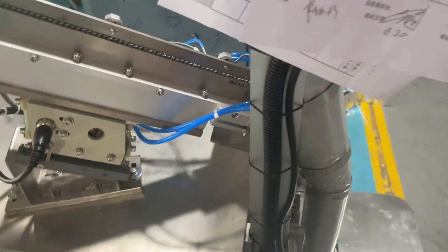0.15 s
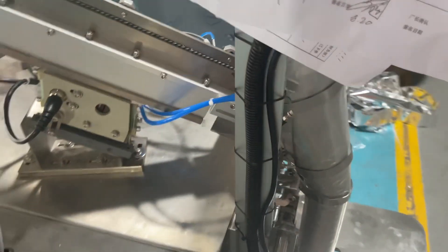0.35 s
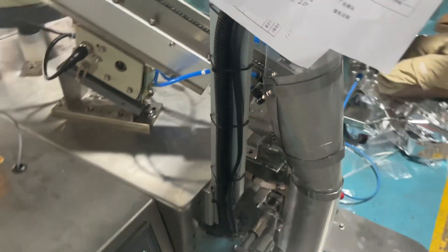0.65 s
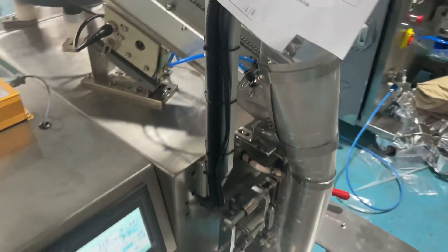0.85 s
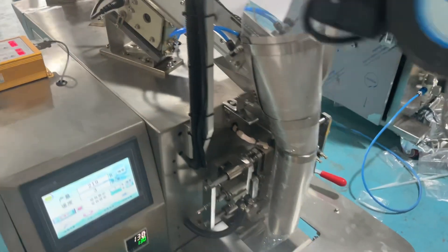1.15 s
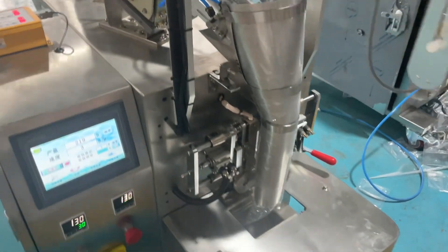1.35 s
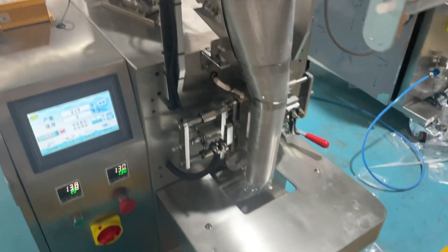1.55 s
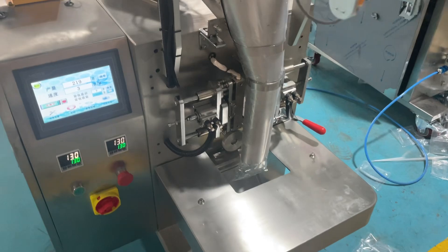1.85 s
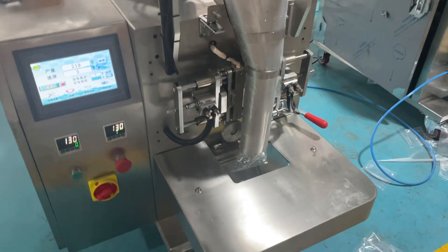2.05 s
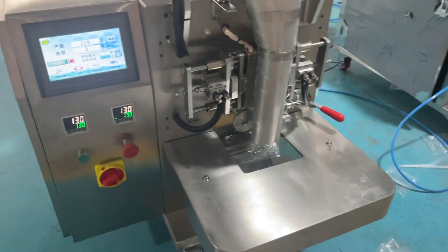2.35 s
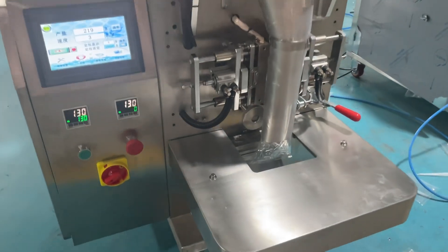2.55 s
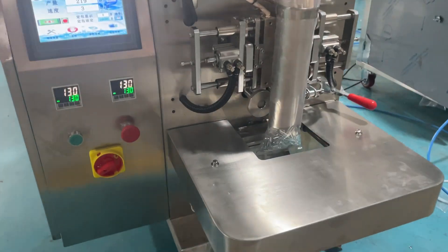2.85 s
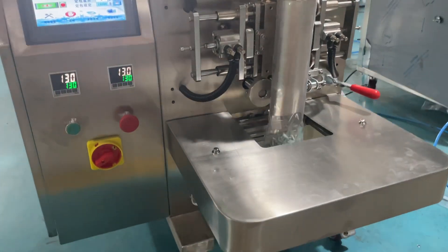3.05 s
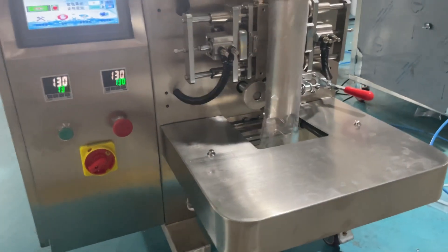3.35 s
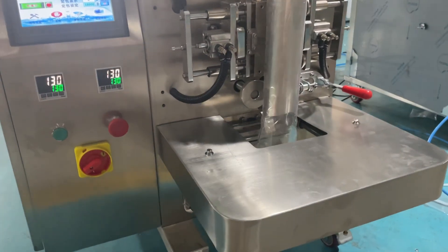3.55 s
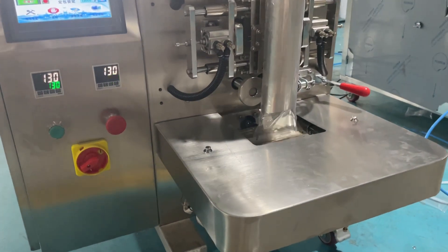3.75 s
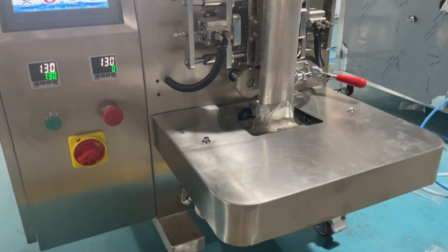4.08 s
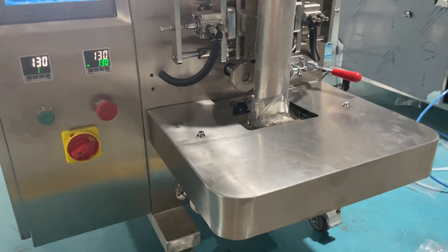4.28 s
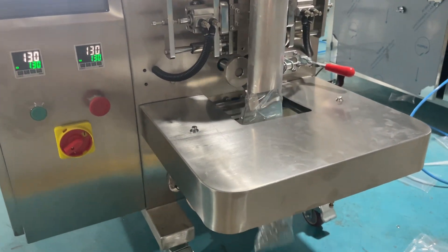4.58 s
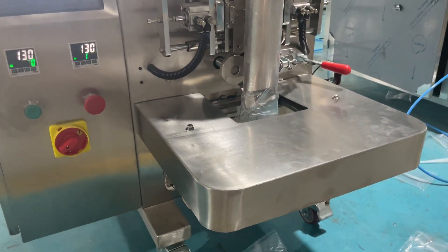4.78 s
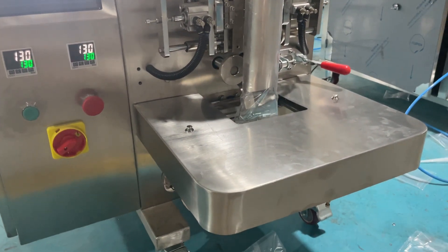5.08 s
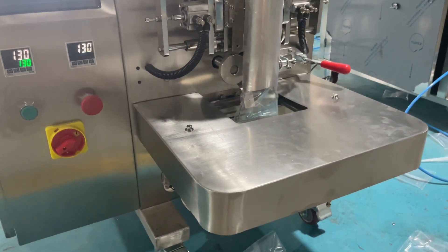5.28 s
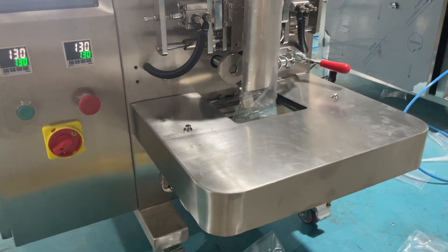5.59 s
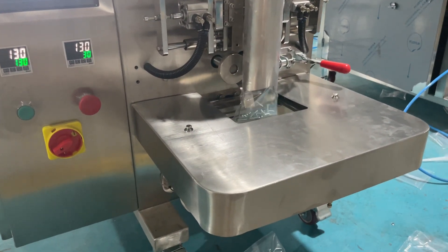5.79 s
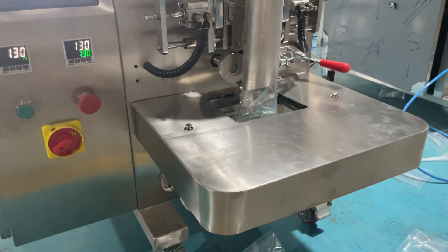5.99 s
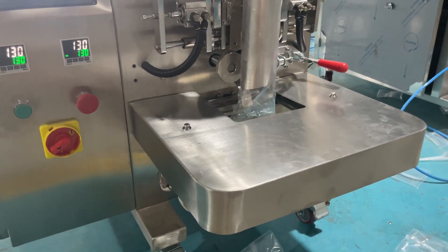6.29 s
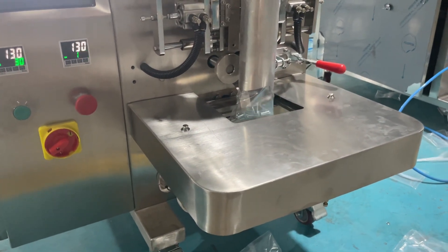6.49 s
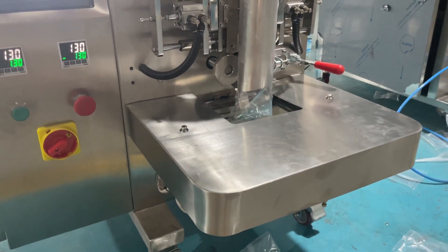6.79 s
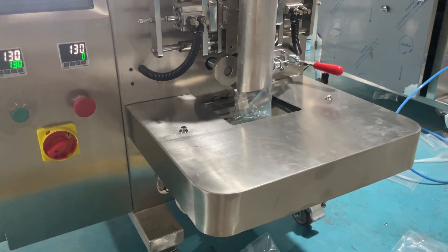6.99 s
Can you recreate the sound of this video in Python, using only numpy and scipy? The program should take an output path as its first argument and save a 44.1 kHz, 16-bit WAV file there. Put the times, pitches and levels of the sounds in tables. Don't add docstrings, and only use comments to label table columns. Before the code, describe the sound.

Close stereo in a factory hall: a low mains hum shakes screws along a steel track with bright, grainy rattle, clicks into a chute and dull regular knocks from a distant press. The feed pauses; jaw drive rumbles, cylinders thud in a cluster and stray screws ping. Finally a buzzier feeder starts and a loud batch clatters down.

```python
import sys
import numpy as np
from scipy import signal
from scipy.fft import rfft, irfft, next_fast_len
from scipy.io import wavfile

SR = 44100
rng = np.random.default_rng(int(sys.argv[2]) if len(sys.argv) > 2 else 0)


def pcm_store(signal):
    levels = np.round(np.clip(np.atleast_2d(signal), -1, 1) * 32767)
    wavfile.write(sys.argv[1], SR, levels.astype(np.int16).T)


def voltage_ratio(level):
    return 10 ** (np.asarray(level, float) / 20)


N = 314433

MAINS_HZ = 50.0
# multiple of the mains frequency, level in [dB].
FIRST_ORDERS = [(1, 1.5), (2, -7), (3, -5), (4, -14), (5, -13.5), (6, -14), (7, -15.5), (8, -16.5),
                (9, -16), (10, -28)]
SECOND_ORDERS = [(1, 1.5), (2, -3.5), (3, -4.5), (4, -13), (5, -20), (6, -21), (7, -12.5), (8, -15.5),
                 (9, -7.5), (10, -8), (11, -42), (12, -26), (13, -24.5), (14, -29), (15, -37), (16, -25),
                 (17, -28), (18, -8.5), (19, -15.5), (20, -35), (21, -21.5), (22, -21.5), (23, -25)]
# on in [s], off in [s], level of the 50 Hz tug in [dB].
FIRST_FEED = [
    (-0.3, 1.33, -35.5),
    (0.85, 1.5, -48),
    (1.72, 1.804, -25.5),
    (2.09, 2.11, -32),
]
SECOND_FEED = [
    (5.125, 7.5, -29),
]
SPIN_UP_S, RUN_DOWN_S = 0.11, 0.12

# time in [s], level in [dB].
HALL_LEVEL = [(0, -38.5), (0.32, -33.5), (0.55, -39), (1.3, -37), (1.5, -49.5), (1.75, -42), (2.28, -40.5),
              (2.98, -49), (3.2, -41.5), (3.38, -53), (3.6, -42), (4.1, -43.5), (4.3, -42), (4.67, -31.5),
              (4.95, -46), (5.14, -48), (5.3, -34), (7.13, -33.5)]
# frequency in [Hz], level in [dB per Hz].
RUMBLE_SPECTRUM = [(26, -79), (45, -1), (140, -3), (172, -7.5), (230, -10), (270, -15.5), (321, -12),
                   (500, -19), (650, -41), (1100, -120)]
# frequency in [Hz], level in [dB per Hz].
ROAR_SPECTRUM = [(200, -11), (280, -1), (350, -2.5), (500, -6), (700, -11.5), (1000, -7.5), (1500, -12),
                 (2300, -12.5), (3000, -9.5)]
# start in [s], stop in [s], added rumble in [dB].
JAW_DRIVE = [
    (1.3, 1.937, 7.5),
    (1.98, 3.0, 1.5),
    (3.053, 3.474, 10),
    (3.497, 4.988, 8.5),
    (5.133, 5.954, 8),
]
DRIVE_EASE_S = 0.048
RUMBLE_DB, RUMBLE_FOLLOWS = -44.5, 0.34

# time in [s], level in [dB].
TRACK_LEVEL = [(0, -29.5), (1.33, -37), (1.41, -45), (1.55, -49), (1.66, -39.5), (1.89, -40), (2.2, -36),
               (2.46, -43), (2.86, -51), (3.5, -53), (3.71, -47), (4.53, -33.5), (4.75, -40.5), (5.1, -54),
               (5.2, -39.5), (5.32, -36.5), (5.62, -32.5), (7.13, -35)]
# frequency in [Hz], level in [dB per Hz].
RATTLE_SPECTRUM = [(1000, -6.5), (1700, 4), (2700, 4.5), (4300, 8.5), (5500, 11.5), (7200, -7), (9000, 22),
                   (11000, -7), (12700, 3.5), (14500, 5.5), (15700, -5)]
# frequency in [Hz], width in [Hz], level in [dB].
TRACK_MODES = [(1470, 70, -6), (2200, 50, -9), (2650, 40, -7), (2900, 70, -3), (3420, 40, -9),
               (4220, 30, -9), (4495, 25, -7), (4635, 40, -9), (5550, 30, -10), (5900, 25, -10),
               (6170, 22, -8), (6595, 20, -7), (7100, 40, -10), (9765, 30, -13)]
FED_BRIGHT_DB, IDLE_BRIGHT_DB, BRIGHT_FOLLOWS = 5, -2.5, 0.3

# start in [s], end in [s], from in [Hz], to in [Hz], level in [dB].
SQUEAKS = [(1.315, 1.39, 980, 1400, -33), (1.43, 1.49, 1130, 1080, -41), (3.0, 3.55, 5950, 5850, -50),
           (2.64, 3.0, 4650, 4430, -50), (.36, .5, 6600, 6600, -41), (.72, .92, 6600, 6600, -39),
           (1.15, 1.43, 6600, 6600, -43), (1.753, 1.9, 2980, 2980, -35), (1.753, 1.86, 4430, 4430, -36),
           (3.02, 3.4, 4500, 4450, -51), (0, 1.0, 2950, 2950, -41), (.9, 1.45, 2950, 2900, -42),
           (4.96, 4.99, 1550, 1600, -42), (4.065, 4.15, 4650, 4650, -38), (6.474, 6.505, 13500, 13500, -12),
           (3.987, 4.012, 13600, 13600, -30), (4.06, 4.1, 6800, 6800, -35), (4.2, 4.25, 1200, 1000, -36)]

# start in [s], peak in [dB].
DROPS = [(0.131, -15), (0.207, -11), (0.249, -12.5), (0.963, -14), (0.99, -14), (1.0227, -10.5),
         (1.073, -11.5), (5.4565, -23), (5.53, -6.5), (5.951, -17.5), (6.192, -12), (6.258, -8),
         (6.307, -11), (6.345, -7.5), (6.479, -10), (7.034, -10), (7.113, -5)]
DROP_T60_S, DROP_TREBLE_DB = 0.053, 5.5
# start in [s], peak in [dB], spill T60 in [s].
SPILLS = [(1.451, -12.5, 0.019), (1.695, -26, 0.28), (1.7544, -18, 0.17), (2.248, -27, 0.11),
          (2.504, -14, 0.11), (2.538, -27, 0.057), (2.5825, -29.5, 0.16), (3.011, -27.5, 0.019),
          (3.52, -32, 0.11), (3.55, -19.5, 0.04), (3.819, -11.5, 0.031), (3.8255, -13, 0.035),
          (3.916, -26, 0.025), (4.042, -32, 0.023), (3.844, -9.5, 0.042), (3.8783, -12.5, 0.063),
          (3.9867, -16.5, 0.035), (4.018, -21, 0.033), (4.0597, -13.5, 0.027), (4.349, -16.5, 0.054),
          (4.4844, -15, 0.036), (4.58, -12, 0.037), (4.614, -13, 0.15), (5.138, -30, 0.14),
          (5.152, -17, 0.024)]
SPILL_TREBLE_DB = 4.5
# start in [s], peak in [dB].
STRAGGLERS = [(0.167, -8), (0.6504, -10), (1.144, -8.5), (1.633, -38), (2.653, -19.5), (3.0829, -38),
              (3.378, -26), (3.5093, -28), (4.2, -34), (4.324, -13.5), (4.732, -16.5), (5.1262, -28),
              (5.4081, -14), (5.568, -5.5), (5.588, -6.5), (6.274, -6), (6.337, -7), (6.376, -2.5),
              (6.389, -3.5), (6.4964, -14), (7.028, -14), (7.066, -15), (5.615, -11)]
STRAGGLER_T60_S, STRAGGLER_TREBLE_DB = 0.027, 0.5
# frequency in [Hz], level in [dB], T60 in [s].
CHUTE_MODES = [(2250, -4, .1), (2880, 0, .12), (3060, -3, .1), (3320, -1, .1), (3660, -3, .1),
               (3900, -3, .08), (4180, -1, .1), (4480, 0, .12), (4640, -2, .1), (4930, -3, .08),
               (5370, -3, .08), (5550, -3, .08), (6050, -4, .08), (6620, -3, .08), (7100, -5, .06),
               (10100, -8, .05), (11050, -8, .05)]
# frequency in [Hz], level in [dB per Hz].
CRACK_SPECTRUM = [(1500, -10.5), (2200, -17), (2900, -1), (4600, 2.5), (6000, -2), (7800, 1)]
TAIL_T60_S, RING_DB = 0.28, -31

# start in [s], peak in [dB], ping in
# [Hz], bright edge in [dB].
STRIKES = [(0.1313, -11, 3830, -12), (0.2097, -10, 2900, -14), (0.6518, -16, 4510, -16),
           (0.966, -19, 4660, 1), (0.99, -10, 4650, -12), (1.0221, -15, 3440, -6), (1.075, -15, 5480, 0),
           (1.1438, -19, 4400, -5), (1.4541, -20.5, 2900, -7), (1.7021, -16.5, 3330, -20),
           (1.7579, -9, 3020, -21), (2.252, -12, 2900, -18), (2.5088, -22, 3330, -15),
           (3.0111, -40, 3210, -7), (3.083, -30, 5900, -11), (3.3813, -26.5, 4420, -15),
           (3.5105, -27, 3000, -20), (3.5239, -21, 2240, -18), (3.5514, -18, 2170, -9),
           (3.7403, -26, 2260, -19), (3.8267, -14, 3520, -18), (3.847, -10, 4790, -22),
           (3.8816, -13, 4140, -4.5), (3.9764, -21, 3960, -15), (3.9894, -19, 6460, -18),
           (4.0183, -20.5, 2106, -4), (4.063, -16.5, 4300, -17), (4.2045, -16, 2660, -24),
           (4.3208, -16, 3940, -23), (4.3531, -21, 4900, -19), (4.4864, -8.5, 3060, -12),
           (4.581, -15, 4410, -25), (4.6145, -8, 4540, -15), (5.1258, -28, 3740, -10),
           (5.1506, -23, 3330, -9), (5.1545, -21, 4840, -9), (5.4097, -10.5, 4300, -15),
           (5.4552, -15, 2650, -11), (5.529, -7.5, 5630, -27), (5.5918, -4.5, 4352, -24),
           (6.1939, -10.5, 4030, -3), (6.2634, -11, 4660, -17), (6.3075, -8, 5760, -23),
           (6.3425, -6.5, 4590, -19), (6.3774, 1.5, 6202, -24), (6.4777, -9.5, 3570, -16),
           (7.0384, -17, 4010, -9), (7.1188, -17, 4070, -18),
           (2.5405, -20, 6840, -12), (2.585, -18, 6900, -12), (2.621, -28, 4600, -8),
           (3.919, -19, 3000, -20), (5.578, -8, 2970, -20), (5.622, -13, 4600, -20),
           (5.645, -16, 4600, -18), (5.692, -10.5, 3130, -25), (5.967, -16, 6100, -17),
           (6.278, -14, 3560, -12), (0.963, -17, 4240, -7), (3.514, -27, 2950, -13), (6.392, -5, 4280, -22),
           (6.408, -11, 4000, -18)]
# share of the ping pitch [ratio], level in [dB].
PING_RATIOS = [(1, 4.5), (1.1, -8), (.73, -15), (1.17, -8.5), (1.3, -1), (1.58, -14), (1.4, 0)]
# frequency in [Hz], level in [dB], T60 in [s].
FUNNEL_MODES = [(1500, -10.5, 0.21), (1950, -13, 0.12), (2217, -11.5, 0.19), (2324, -13, 0.18)]
STRIKE_DB, CONTACT_T60_S, PING_T60_S = -11.5, 0.016, 0.052
EDGE_DB, EDGE_T60_S, EDGE_RISE_S = 21, 0.041, 0.0033

# start in [s], peak in [dB].
PRESS_KNOCKS = [
    (0.256, -10),
    (0.655, -11.5),
    (1.056, -13),
    (1.455, -13),
    (1.858, -15),
    (2.258, -13.5),
    (2.649, -15),
    (5.849, -39),
    (6.249, -19),
    (6.638, -34),
]
# frequency in [Hz], level in [dB], T60 in [s].
PRESS_MODES = [(72, 0.5, 0.094), (308, -6.5, 0.079), (480, -2.5, 0.13), (560, -7.5, 0.15),
               (612, -3.5, 0.091), (880, -28, 0.13), (910, -8, 0.12), (1060, -11, 0.18), (1410, -16, 0.2)]

# start in [s], stop in [s], level in [dB].
VENTS = [
    (3.073, 3.18, -37),
    (2.99, 3.38, -54),
    (5.2, 5.3, -32.5),
    (6.3, 6.42, -39),
    (0.87, 1.15, -33),
    (3.54, 3.74, -43.5),
]
# frequency in [Hz], level in [dB per Hz].
VENT_SPECTRUM = [(2000, -25), (4000, -6.5), (7000, -6.5), (10000, -4.5), (15700, -11)]
VENT_RISE_S, VENT_FALL_S = 0.045, 0.074

# start in [s], peak in [dB], ring in [Hz], ring T60 in [s], clatter in [dB].
THUDS = [(2.63, -33, 68, 0.24, 3), (3.128, -27.5, 59.6, 0.19, -4), (3.19, -22, 57, 0.13, -10),
         (3.387, -19, 64.6, 0.085, -13), (3.517, -16, 83, 0.18, -16.5), (3.578, -25, 69.5, 0.12, -27),
         (3.624, -25, 109, 0.1, -25), (3.684, -30, 90, 0.071, -25), (3.747, -15, 100, 0.082, -25),
         (3.77, -6, 104, 0.093, -31), (3.841, -15, 96, 0.09, -21), (3.884, -14, 85, 0.073, -25),
         (3.924, -17, 95, 0.082, -28), (3.806, -11, 84, 0.09, -18), (3.866, -13.5, 78, 0.11, -20),
         (3.949, -14, 56, 0.085, -13), (4.019, -18, 78, 0.096, -25), (4.173, -27, 100, 0.095, -25),
         (4.248, -25, 129, 0.1, -25), (4.322, -19, 85, 0.088, -21), (4.385, -25, 90, 0.12, -25),
         (4.598, -14.5, 98, 0.1, -20), (4.636, -20, 120, 0.1, -20), (4.665, -22, 100, 0.1, -20),
         (4.701, -20, 85, 0.1, -20), (4.735, -33, 112, 0.1, -16), (4.068, -21, 80, 0.1, -29),
         (4.122, -20, 85, 0.1, -18), (4.34, -21, 89, 0.31, -11), (4.417, -15, 105.5, 0.08, -33),
         (4.62, -18, 154, 0.08, -3), (4.676, -27, 186, 0.091, -3), (5.131, -25.5, 89.5, 1, -6.5),
         (5.44, -21, 63, 0.32, -27), (5.529, -17.5, 62.4, 0.2, -25), (5.654, -14.5, 59, 0.18, -25),
         (5.93, -22, 72, 0.2, -25), (6.73, -27, 72, 0.15, -25), (6.99, -21, 61.99, 0.25, -25)]
# start in [s], peak in [dB], ring in [Hz], T60 in [s], clatter in [dB].
TABLE_TOP = [(1.805, -32.5, 431, 0.34, -11), (3.651, -30.5, 390, 0.1, 2.5), (3.739, -23.5, 386, 0.18, -3),
             (3.77, -41.5, 297, 0.51, 5.5), (3.912, -28, 418, 0.3, -8), (3.56, -32.5, 488, 0.19, -7),
             (3.95, -31.5, 458, 0.19, -2), (3.977, -27, 487, 0.11, -20), (4.012, -27, 431, 0.21, -10.5),
             (4.11, -35, 480, 0.11, -5), (4.199, -21.5, 432, 0.44, -14), (4.222, -27.5, 466, 0.55, -11),
             (4.355, -35, 490, 0.46, -17), (4.588, -27, 560, 0.1, -10), (4.73, -31, 451, 0.37, -10),
             (4.586, -26.5, 343.4, 0.57, -4)]

# frequency in [Hz], likeness in [0-1].
LIKENESS = [(60, .9), (340, .93), (700, .68), (1700, .44), (2800, .6), (4200, .76), (5300, .6), (6200, .8),
            (7600, .96), (8800, .96), (9800, .75), (11000, .96), (12200, .96), (13200, .6), (14000, .97)]
# frequency in [Hz], lead of the left in [rad].
PORT_PHASE = [(0, 0), (1000, .3), (2000, 0), (2900, .8), (3900, -.1), (5100, .3), (6300, -.4), (7700, -3.0),
              (8900, -3.3), (10600, -6.1), (12700, -6.45), (13900, -9.3), (15100, -9.45), (15800, -9.85)]
# frequency in [Hz], left over right in [dB].
PORT_BALANCE = [(60, .5), (500, -.3), (1200, 1.5), (2800, 2.8), (4200, 1.6), (6400, 1.4), (7600, 0)]
# frequency in [Hz], level in [dB].
TREBLE_SHAPE = [(11000, -1), (13000, -12), (14200, -8), (15900, 0)]


def rms_one(x):
    return x / np.sqrt(np.mean(x ** 2) + 1e-20)


def over_time(rows):
    return np.interp(np.arange(N) / SR, *np.transpose(rows))


def at_hz(points, hz):
    known_hz, value = np.transpose(points)
    return np.interp(np.log(hz + 1), np.log(known_hz + 1), value)


def white():
    return rng.standard_normal((2, N))


def bandpass(x, low_hz, high_hz, order=2):
    return signal.sosfilt(signal.butter(order, [low_hz, high_hz], "band", fs=SR, output="sos"), x)


def drift(rate):
    r = np.exp(-80 * np.pi * rate / SR)
    slow = signal.lfilter([1], [1, -2 * r, r * r], rng.standard_normal(N // 40 + 2002))[2000:]
    return np.interp(np.arange(N) / 40, np.arange(len(slow)), rms_one(slow))


def ring(clicks, hz, t60):
    r, w = voltage_ratio(-60 / (t60 * SR)), 2 * np.pi * hz / SR
    return signal.lfilter([0, np.sin(w)], [1, -2 * r * np.cos(w), r * r], clicks + 1e-18)


def colour(x, spectrum, patchy_db, rate, tilt_db=0):
    lowest, highest = spectrum[0][0], spectrum[-1][0]
    edges = lowest * 2 ** np.arange(0, np.log2(highest / lowest) + .3, .4)
    out, power = 0, 0
    for low, high in zip(edges, np.minimum(edges[1:], 17000)):
        hz = np.sqrt(low * high)
        band = voltage_ratio(at_hz(spectrum, hz)) * bandpass(x, low, high)
        x = np.roll(x, 3 * SR // 50, axis=-1)
        power += np.mean(band ** 2)
        out = out + band * voltage_ratio(patchy_db * drift(rate) + tilt_db * max(np.log2(hz / 4000), 0))
    return out / np.sqrt(power)


def grains(density, spread_db):
    sizes = voltage_ratio(spread_db * np.minimum(rng.exponential(1, (2, N)), 4)) * white()
    return rms_one(sizes * (rng.random((2, N)) < density / SR))


def burst(s, peak_db, t60, rise_s):
    start = round(s * SR)
    t = np.arange(min(int(t60 * SR) + 9, N - start)) / SR
    return slice(start, start + len(t)), voltage_ratio(peak_db - 60 * t / t60) * (1 - np.exp(-t / rise_s))


def switched(start, stop, rise_s, fall_s):
    t = np.arange(N) / SR
    rise = 1 - np.exp(-np.clip(t - start, 0, stop - start) / rise_s)
    return rise * np.exp(-np.maximum(t - stop, 0) / fall_s)


def feeder(runs, orders):
    t, hum = np.arange(N) / SR, 0
    for k, level_db in orders:
        scatter = np.clip(1.64 * (k - 3), 0, 3) * rng.normal()
        phase = k * 2 * np.pi * MAINS_HZ * (t + 0.00896) + scatter
        settled = np.clip((t - runs[0][0] + .02) / (.05 + .012 * k), 0, 1)
        hum = hum + settled * voltage_ratio(level_db + min(.3 * k, 2.2) * drift(6)) * np.cos(phase)
    tug = sum(voltage_ratio(db) * switched(on, off, SPIN_UP_S, RUN_DOWN_S) for on, off, db in runs)
    return np.sqrt(2) * hum * tug


def hall():
    roar_db = over_time(HALL_LEVEL)
    drive_db = sum(db * switched(on, off, DRIVE_EASE_S, DRIVE_EASE_S) for on, off, db in JAW_DRIVE)
    rumble_db = RUMBLE_DB + RUMBLE_FOLLOWS * (roar_db + 41.0) + drive_db
    rumble = colour(white(), RUMBLE_SPECTRUM, patchy_db=2.5, rate=6.0)
    roar = colour(white(), ROAR_SPECTRUM, patchy_db=2.5, rate=14.7)
    return voltage_ratio(rumble_db) * rumble + voltage_ratio(roar_db) * roar


def track():
    level_db = over_time(TRACK_LEVEL)
    runs = FIRST_FEED + SECOND_FEED
    fed = np.minimum(sum(switched(on, off, RUN_DOWN_S, RUN_DOWN_S) for on, off, _ in runs), 1)
    bright_db = IDLE_BRIGHT_DB + (FED_BRIGHT_DB - IDLE_BRIGHT_DB) * fed
    bright_db = bright_db + BRIGHT_FOLLOWS * (level_db + 45.0) * (1 - fed)
    shake = 1 + 0.062 * np.cos(2 * np.pi * MAINS_HZ * np.arange(N) / SR)
    contacts = grains(density=15000, spread_db=2.5) * shake * voltage_ratio(1.05 * drift(19.0))
    body = colour(contacts, RATTLE_SPECTRUM, patchy_db=1.3, rate=3.0, tilt_db=bright_db)
    modes = sum(voltage_ratio(db + 3 * drift(12)) * rms_one(ring(contacts, hz, 2.2 / width))
                for hz, width, db in TRACK_MODES)
    return voltage_ratio(level_db + 2) * (body + voltage_ratio(-11.5) * modes)


def squeak():
    t, out = np.arange(N) / SR, 0
    unsteady, broken_db = drift(35.0), 4 * drift(25)
    for start, end, from_hz, to_hz, db in SQUEAKS:
        pitch = np.interp(t, [start, end], [from_hz, to_hz]) * (1 + .011 * unsteady)
        swell = np.interp(t, [start, .85 * start + .15 * end, end], [0, 1, 0])
        out = out + voltage_ratio(db + broken_db) * swell * np.sin(2 * np.pi * np.cumsum(pitch) / SR)
    return out


def drops():
    spill, bright = np.zeros(N), np.zeros(N)
    hits = [(s, db, DROP_T60_S, DROP_TREBLE_DB) for s, db in DROPS]
    hits += [(s, db, t60, SPILL_TREBLE_DB) for s, db, t60 in SPILLS]
    hits += [(s, db, STRAGGLER_T60_S, STRAGGLER_TREBLE_DB) for s, db in STRAGGLERS]
    for s, peak_db, t60, treble_db in hits:
        at, shape = burst(s, peak_db - 11, np.clip(t60, .02, .5), rise_s=0.0031)
        spill[at] += shape
        bright[at] += shape * voltage_ratio(treble_db)
    fade = voltage_ratio(-60 / (TAIL_T60_S * SR))
    tail_power = signal.lfilter([1 - fade ** 2], [1, -fade ** 2], np.square([spill, bright]))
    tail, bright_tail = np.sqrt(tail_power)
    clicks = grains(density=9000, spread_db=-3.0)
    crack = colour(clicks, CRACK_SPECTRUM, patchy_db=1.5, rate=230.0) * (spill + voltage_ratio(5) * tail)
    top = rms_one(bandpass(clicks, 7600, 15800, order=3)) * (bright + voltage_ratio(-4.5) * bright_tail)
    rings = sum(voltage_ratio(db + 4 * drift(9)) * ring(clicks * spill, hz, t60) for hz, db, t60 in CHUTE_MODES)
    return crack + voltage_ratio(-0.5) * top + voltage_ratio(RING_DB) * rings


def strikes(hits):
    out = np.zeros((2, N + SR))
    noise = rng.standard_normal((len(hits), 2, SR // 8))
    luck_db = 2 * rng.standard_normal((len(hits), len(PING_RATIOS + FUNNEL_MODES)))
    edge = bandpass(noise, 8500, 15000)
    t = np.arange(SR // 8) / SR
    contact = voltage_ratio(-60 * t / CONTACT_T60_S) * (1 - np.exp(-t / 0.0011))
    spray = voltage_ratio(-60 * t / EDGE_T60_S) * (1 - np.exp(-t / EDGE_RISE_S))
    for (s, peak_db, hz, edge_db), hiss, bright, lucks in zip(hits, noise, edge, luck_db):
        modes = [(hz * share, db, PING_T60_S) for share, db in PING_RATIOS] + FUNNEL_MODES
        pings = sum(voltage_ratio(db + luck) * ring(hiss * contact, min(mode_hz, 15000), t60)
                    for (mode_hz, db, t60), luck in zip(modes, lucks))
        hit = voltage_ratio(-18.0) * pings + voltage_ratio(edge_db + EDGE_DB) * bright * spray
        start = round((s - .001) * SR)
        out[:, start:start + len(t)] += voltage_ratio(peak_db + STRIKE_DB) * hit
    return out[:, :N]


def press():
    push = np.zeros(N)
    for s, peak_db in PRESS_KNOCKS:
        at, shape = burst(s, peak_db, 0.077, rise_s=0.0071)
        push[at] += shape
    push = push * white()
    thump = bandpass(push, 120, 1500)
    rings = sum(voltage_ratio(db) * ring(push, hz, t60) for hz, db, t60 in PRESS_MODES)
    return voltage_ratio(-35) * rings + voltage_ratio(-2.0) * thump


def vents():
    flow = sum(voltage_ratio(db) * switched(on, off, VENT_RISE_S, VENT_FALL_S) for on, off, db in VENTS)
    return flow * colour(white(), VENT_SPECTRUM, patchy_db=3.0, rate=5.3)


def thuds():
    out, boom, loose = np.zeros((2, N)), np.zeros(N), np.zeros(N)
    wobble_db = 1.4 * drift(30)
    for s, peak_db, hz, t60, clatter_db in THUDS + TABLE_TOP:
        at, shape = burst(s, peak_db, np.clip(t60, .03, .7), rise_s=1.0 / hz)
        t = np.arange(len(shape)) / SR
        panel = np.sin(2 * np.pi * hz * t) + 0.5 * np.sin(2 * np.pi * 1.085 * hz * t)
        out[0, at] += shape * voltage_ratio(wobble_db[at]) * panel
        loose[at] += shape * voltage_ratio(clatter_db - 5.0)
        boom[at] += shape * voltage_ratio(clatter_db - 40 * t / t60)
    cabinet = rms_one(bandpass(white(), 150, 600))
    clatter = rms_one(bandpass(white(), 760, 1750))
    return out + voltage_ratio(3) * cabinet * boom + clatter * loose


def scene():
    machine = hall() + track() + drops() + strikes(STRIKES) + press() + vents() + thuds()
    shared, diffuse = machine
    shared = shared + feeder(FIRST_FEED, FIRST_ORDERS) + feeder(SECOND_FEED, SECOND_ORDERS) + squeak()
    size = next_fast_len(N)
    alike = np.clip(at_hz(LIKENESS, np.arange(size // 2 + 1) * SR / size), 0, 1)
    mid = np.sqrt((1 + alike) / 2) * rfft(shared, size)
    side = np.sqrt((1 - alike) / 2) * rfft(diffuse, size)
    return irfft([mid + side, mid - side], size)[:, :N]


def low_pass(x):
    return signal.sosfilt(signal.butter(12, 15950, fs=SR, output="sos"), x)


def record(dry):
    size = next_fast_len(N + 999)
    hz = np.arange(size // 2 + 1) * SR / size
    phase = np.interp(hz, *np.transpose(PORT_PHASE))
    half = voltage_ratio(at_hz(PORT_BALANCE, hz) / 2) * np.exp(.5j * phase)
    response = (hz < 15780) * voltage_ratio(at_hz(TREBLE_SHAPE, hz))
    ports = irfft(rfft(dry, size) * response * [half, 1 / half], size)[:, :N]
    return low_pass(ports)


dry = scene()
out = record(dry)
pcm_store(out)
```